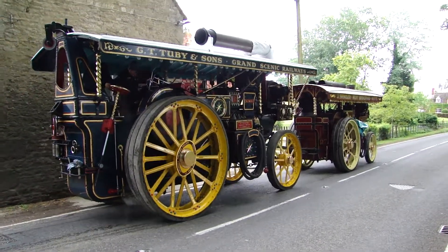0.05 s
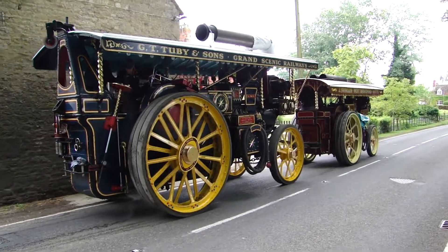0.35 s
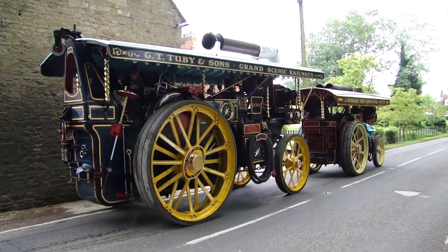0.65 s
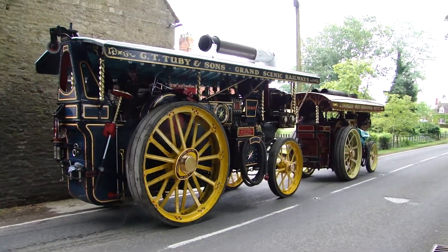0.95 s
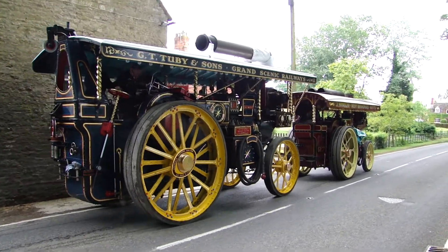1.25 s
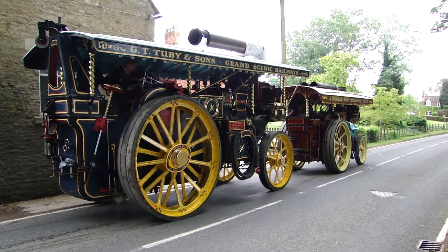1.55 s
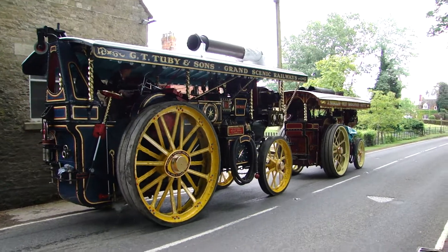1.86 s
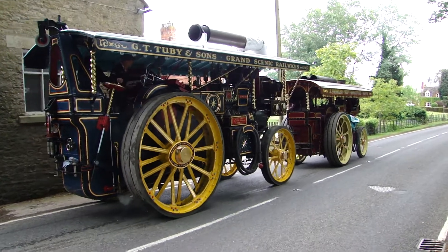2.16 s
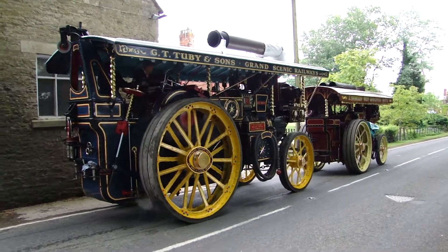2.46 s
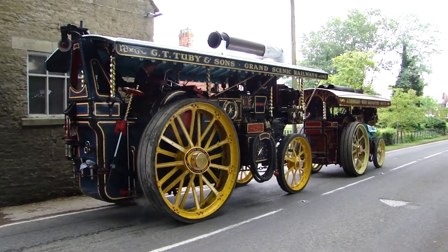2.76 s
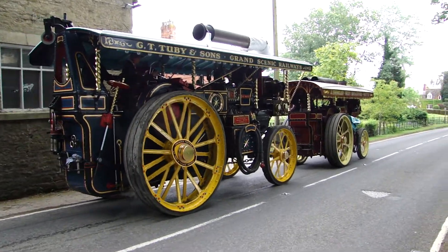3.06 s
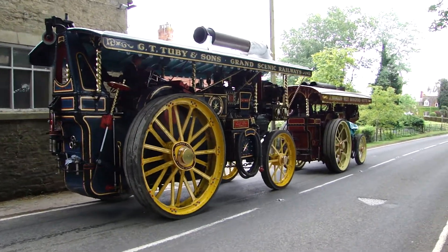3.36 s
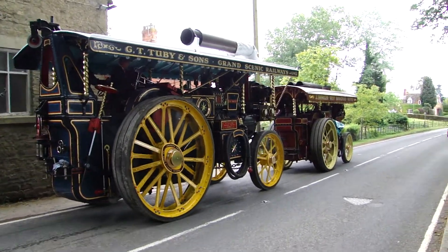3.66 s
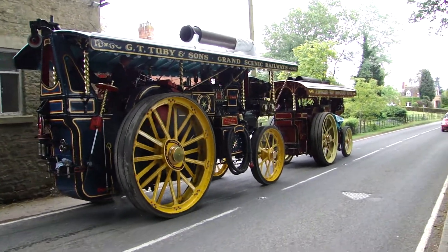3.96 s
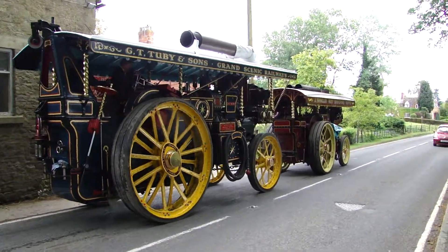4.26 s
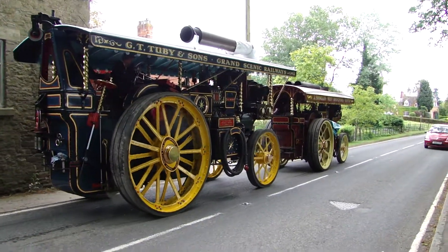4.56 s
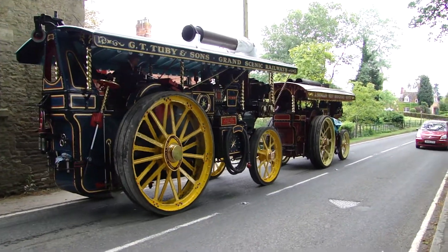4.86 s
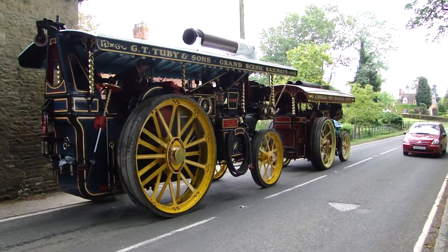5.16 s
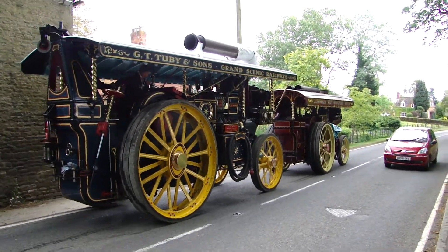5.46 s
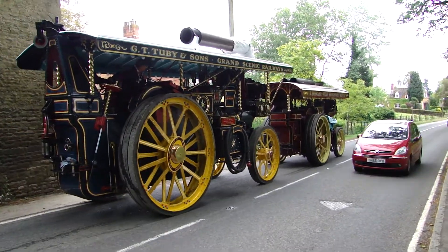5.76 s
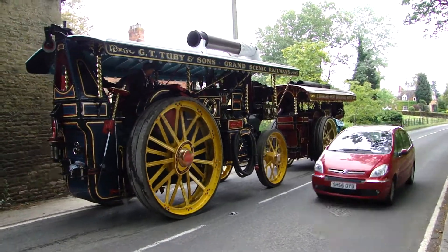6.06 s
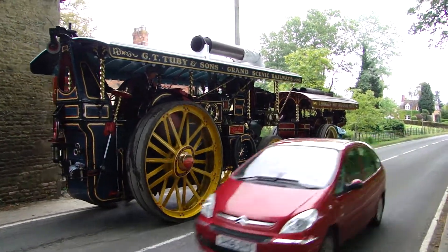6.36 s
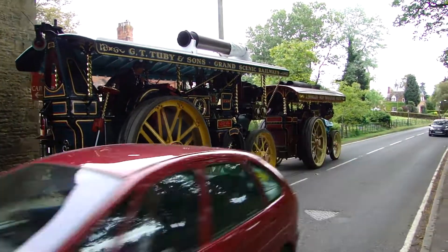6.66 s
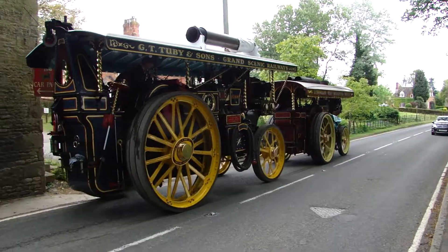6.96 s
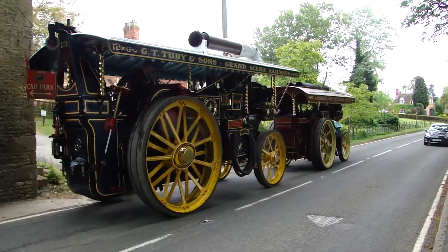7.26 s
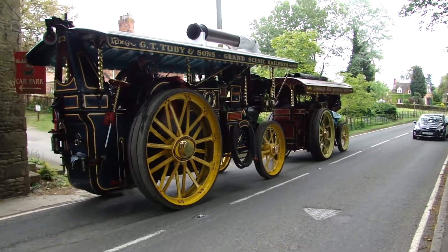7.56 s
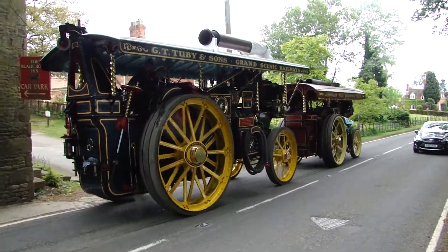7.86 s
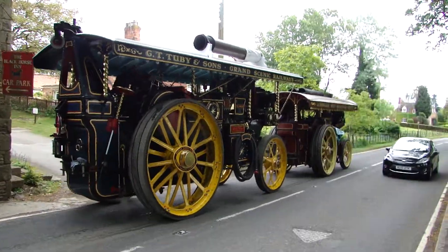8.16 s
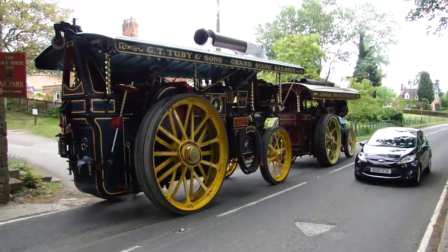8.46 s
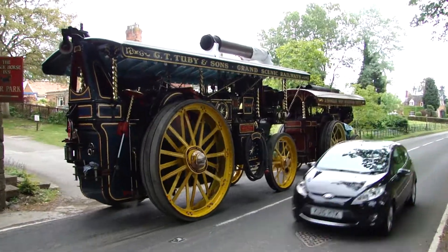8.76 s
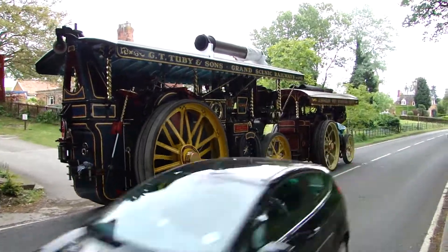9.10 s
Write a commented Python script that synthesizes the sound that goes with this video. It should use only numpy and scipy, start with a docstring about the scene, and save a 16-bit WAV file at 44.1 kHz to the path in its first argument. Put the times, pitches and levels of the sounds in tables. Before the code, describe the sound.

Two steam traction engines crawl along a village road, blowing off steam in a continuous bright hiss with a thin, wavering whistle and brief squeals. Underneath, a chimney draught roars and rings hollowly. In the second half, two cars pass close to the roadside microphone from right to left, one after the other, their tyres roaring and briefly dulling the steam.

```python
"""Two showman's steam engines blow off steam as they crawl along a village road.
At the roadside microphone pair the jet stands a little to the right: its turbulence hisses, sings in
wandering bands and whistles, while behind it the draught roars and rings in a chimney.
Two cars pass from right to left, about 3 m away, on roaring tyres;
each hides the jet for a moment with its body."""
import sys
import numpy as np
from scipy import signal
from scipy.fft import rfft, irfft, next_fast_len
from scipy.io import wavfile

SR = 44100
rng = np.random.default_rng(int(sys.argv[2]) if len(sys.argv) > 2 else 0)


def put_to_file(sound):
    """Save the sound as 16-bit audio at rate SR, in the file named by the first command-line argument."""
    columns = np.atleast_2d(sound).T  # one column per channel
    safe = np.clip(columns, -1, 1)
    whole_steps = np.round(safe * 32767)
    wavfile.write(sys.argv[1], SR, whole_steps.astype(np.int16))


N = 411453
TIME = np.arange(N) / SR

# how alike the two microphones hear the road: (frequency [Hz], coherence [0-1])
MIC_COHERENCE = [(40, 0.89), (300, 0.95), (1000, 0.67), (1550, 0.53), (2300, 0.68), (3300, 0.38),
                 (4100, 0.63), (5200, 0.57), (6500, 0.15), (8200, 0.088), (9900, 0.29), (12000, .1)]
# passing cars: (time when closest [s], speed [m/s], distance [m], tyres [dB], tread note [dB], horn [dB],
# rumble [dB], time it hides the jet [s], half the time hidden [s], shadow [dB], shadow's edge [s])
CAR_PASSES = [(6.72, 11.6, 3.0, -25, -23.2, -29, -26.3, 6.7, 0.205, 8, 0.008),
              (9.22, 11.2, 2.685, -25, -21, -27.5, -24, 9.35, 0.34, 7.5, 0.1)]

# one spurt of wet steam brightens the jet's spray
SPURT_S, SPURT_ATTACK_S, SPURT_HOLD_S, SPURT_RELEASE_S, SPURT_DB = 2.3, 0.35, 0.75, 0.25, 1.3


def from_db(db):
    """Decibels to gain."""
    return 10 ** (np.asarray(db) / 20)


def unit_power(x):
    """Scale to unit power."""
    return x / np.sqrt(np.mean(np.abs(x) ** 2) + 1e-20)


def in_time(rows):
    """Each column of a curve at every sample."""
    times, *columns = np.transpose(rows)
    return [np.interp(TIME, times, column) for column in columns]


def at_hz(points, hz):
    """Read a spectrum on a log-frequency axis."""
    frequencies, values = np.transpose(points)
    return np.interp(np.log(hz), np.log(frequencies), values)


def bump(when, span):
    """A smooth swell of height 1."""
    return np.exp(-((TIME - when) / span) ** 2)


def ramp(start, length):
    """A rise from 0 to 1 that stays."""
    return np.clip((TIME - start) / length, 0, 1)


def drift(rate_hz):
    """Slow random wander with spread 1."""
    pole = np.exp(-80 * np.pi * rate_hz / SR)
    slow = signal.lfilter([1], [1, -2 * pole, pole * pole], rng.standard_normal(N // 40 + 2002))[2000:]
    return np.interp(np.arange(N) / 40, np.arange(len(slow)), unit_power(slow))


def swells(bands, events):
    """The dB that each band gains from the swells nearest to it in pitch."""
    swell_db = np.zeros((len(bands), N))
    for when, hz, span, rise_db in events:
        nearest = np.argmin([abs(band[0] - hz) for band in bands])
        swell_db[nearest] += rise_db * bump(when, span)
    return swell_db


def mic_pair(mid, side, hz, coherence, lead_us):
    """Two complex noises as left and right; the sound reaches the left microphone lead_us earlier."""
    pair = np.sqrt(1 + coherence) * mid + np.sqrt(1 - coherence) * side * [[1], [-1]]
    pair[0] *= np.exp(2j * np.pi * hz * lead_us / 1e6)
    return pair


def turbulence(spectrum, lead_us=0):
    """Broad stereo noise of unit power."""
    size = next_fast_len(N, real=True)
    hz = np.maximum(np.arange(size // 2 + 1) * SR / size, 1)
    mid, side = rfft(rng.standard_normal((2, size)))
    pair = mic_pair(mid, side, hz, at_hz(MIC_COHERENCE, hz), lead_us)
    return unit_power(irfft(pair * from_db(at_hz(spectrum, hz)), size)[:, :N])


def noise_band(centre_hz, width_hz, coherence, lead_us=0):
    """A band of stereo noise around a fixed or moving centre; unit power."""
    lowpass = signal.butter(3, width_hz / 2, fs=SR / 20, output="sos")
    real, imag = signal.sosfilt(lowpass, rng.standard_normal((2, 2, N // 20 + 402)))[..., 400:]
    mid, side = real + 1j * imag
    pair = mic_pair(mid, side, np.mean(centre_hz), coherence, lead_us)
    envelopes = np.array([np.interp(np.arange(N) / 20, np.arange(len(mic)), mic) for mic in pair])
    carrier = np.exp(2j * np.pi * np.cumsum(centre_hz * np.ones(N)) / SR)
    return unit_power((envelopes * carrier).real)


def resonances(modes, flicker_db, coherence, lead_us):
    """Turbulence ringing in fixed resonances, each flickering by itself."""
    return sum(from_db(db + flicker_db * drift(7.9)) * noise_band(hz, width_hz, coherence, lead_us)
               for hz, width_hz, db in modes)


def chimney():
    """The slowly growing draught roars, buffets in the smokebox and sets the pipe ringing."""
    # the draught's broad roar and its irregular buffeting: (frequency [Hz], density [dB per Hz])
    roar_spectrum = [(25, -54), (45, -42), (70, -35), (105, -35), (155, -14.5), (200, -10), (330, -2),
                     (430, -4.5), (540, -2.5), (600, -0.5), (780, 2), (1200, 0.5), (1380, -2), (1750, -2),
                     (2100, 0), (3200, -32)]
    buffet_spectrum = [(25, -42), (45, -27), (70, -18), (100, -11.5), (125, -3.5), (160, -2), (205, 2.5),
                       (320, 6), (420, -6), (800, -26)]
    # the pipe's resonances and its hollow note: (frequency [Hz], width [Hz], level [dB])
    pipe_modes = [(155, 21.4, -54.5), (265.8, 28.4, -43.5), (311, 34, -48), (376, 35, -43.5),
                  (470.6, 28, -47), (919, 45, -40), (951, 39, -41), (1112, 76, -39), (1234, 45, -44.5),
                  (1526, 60, -44.5), (1825, 46, -42.5)]
    hollow_modes = [(632, 52, -35.5), (683, 38, -39.5), (721, 71, -39)]
    # brief random surges in the low roar, and a broader swell at the start:
    # (time [s], frequency [Hz], half length [s], rise [dB])
    roar_surges = [(.13, 155, .04, 11), (.35, 267, .06, 9), (.4, 470, .6, 6), (.4, 1526, .6, 2),
                   (.76, 267, 0.055, 9), (.85, 950, .07, 12), (1.4, 155, .15, 5), (1.92, 155, .22, 8),
                   (1.9, 267, 0.055, 14), (2.846, 377, .4, 3), (3.5, 377, .07, 6), (5.2, 1110, 0.051, 9),
                   (5.9, 377, .12, 9), (5.95, 267, 0.092, 5), (6.3, 267, 0.066, 12), (7.017, 267, .08, 14)]
    # the hollow note swells: (time [s], half length [s], rise [dB])
    hollow_swells = [(.5, 1.0, 3), (2.9, .35, 2), (5.7, 0.38, 5), (7.3, .25, 3.5), (7.77, .095, 8.5),
                     (8.047, 0.08, 7.5), (8.351, .2, 5.5)]
    draught_db = -1.5 + 0.1942 * TIME
    roar = from_db(-24.5 + drift(8.8)) * turbulence(roar_spectrum, lead_us=30)
    buffet = from_db(-41.5 + 3.4 * drift(9.4)) * turbulence(buffet_spectrum, lead_us=18)
    bands = [(hz, width_hz, db + surge_db)
             for (hz, width_hz, db), surge_db in zip(pipe_modes, swells(pipe_modes, roar_surges))]
    ringing = resonances(bands, flicker_db=2.5, coherence=0.91, lead_us=14)
    hollow_db = -1.5 + sum(rise_db * bump(when, span) for when, span, rise_db in hollow_swells)
    hollow = from_db(hollow_db) * resonances(hollow_modes, flicker_db=1.5, coherence=0.96, lead_us=18)
    return ((roar + buffet + ringing) * from_db(draught_db) + hollow) * from_db([[-0.4], [0.4]])


def passing(closest, speed, distance):
    """Stereo gain of a source going by from right to left, and the share of its speed that points away."""
    along = speed * (TIME - closest)
    reach = np.hypot(along, distance)
    receding = along / reach
    return distance / reach * from_db(0.87 * receding * np.array([[1], [-1]])), receding


def cars():
    """Tyres roar; the tread note beams ahead and falls in pitch going by; rumble and wake trail."""
    # tyre noise and the rumble of body and engine: (frequency [Hz], density [dB per Hz])
    tyre_spectrum = [(200, -42), (500, -10), (700, -3), (850, -4), (1010, -9), (1220, 3), (1400, -8),
                     (2000, -13), (3000, -24), (6000, -28), (12000, -44)]
    rumble_spectrum = [(25, -36), (60, -27), (110, -23), (180, -6), (285, 4.5), (420, 3), (620, 4),
                       (850, -6.5), (1500, -19), (4000, -41)]
    wheelbase_m, wake_lag_s = 2.7, 0.24
    tread_hz, horn_hz, wake_hz = 1001, 871, 1348
    out = 0
    for closest, speed, distance, tyre_db, tread_db, horn_db, rumble_db, *_ in CAR_PASSES:
        front, _ = passing(closest - 0.14, speed, distance)
        back, _ = passing(closest - 0.14 + wheelbase_m / speed, speed, distance)
        middle, receding = passing(closest, speed, distance)
        rear, _ = passing(closest + 0.056, speed, distance)
        behind, _ = passing(closest + wake_lag_s, speed, distance)
        doppler = 1 / (1 + speed * receding / 343)
        axles = np.hypot(front ** 2.8, back ** 4.2) / np.sqrt(1.5)
        # air pumped from the tread grooves rings
        tread = noise_band(tread_hz * doppler, width_hz=185, coherence=0.94)
        tread *= from_db(tread_db - 1.5 * receding) * axles
        tyres = from_db(tyre_db) * middle ** 1.24 * turbulence(tyre_spectrum)
        # the wedge between tyre and road acts as a horn and throws noise ahead
        horn = noise_band(horn_hz * doppler, width_hz=345, coherence=0.92)
        horn *= from_db(horn_db - 7.5 * receding) * middle
        rumble = from_db(rumble_db) * rear * turbulence(rumble_spectrum)
        # tread noise thrown back behind the car, off the road and the stone wall
        wake = noise_band(wake_hz, width_hz=670, coherence=0.24)
        wake *= from_db(-31.5 + 3 * receding) * behind ** 1.05
        uneven_asphalt = from_db(1.7 * drift(14.5))
        out = out + uneven_asphalt * (tread + tyres + horn + wake) + rumble
    return out


def car_shadow():
    """The dB lost while a car's body stands between jet and microphones."""
    return sum(depth_db * 0.5 * (1 + np.tanh((span - np.abs(TIME - when)) / (2 * edge)))
               for *_, when, span, depth_db, edge in CAR_PASSES)


def street_echoes(direct):
    """Nearby surfaces comb the hiss; the paths shift slightly as the microphones sway."""
    # echoes from canopy, road and stone wall: (delay [ms], level [dB])
    reflections = [(4.3, -13), (11.7, -13), (26.6, -17.5)]
    samples = np.arange(N)
    out = direct
    for delay_ms, level_db in reflections:
        earlier = samples - SR * (delay_ms + 0.076 * drift(0.59)) / 1000
        echo = np.array([np.interp(earlier % N, samples, channel) for channel in direct])
        out = out + from_db(level_db) * echo
    return out


def squeals():
    """Now and then a band of the jet locks into a thin, wavering tone."""
    # squeals: (time [s], frequency [Hz], half length [s], level [dB])
    tones = [(2.25, 2410, .22, -34), (3.98, 2420, 0.19, -31), (4.6, 2385, .19, -29),
             (4.63, 2680, .1, -29.5), (5.42, 2700, .11, -27), (6.36, 2700, .08, -28),
             (6.55, 2700, .05, -29), (6.873, 2688, 0.14, -27.5), (6.95, 2234, 0.051, -22.5),
             (7.15, 2300, .12, -28)]
    out = 0
    for when, hz, span, db in tones:
        phase = 2 * np.pi * np.cumsum(hz + 6 * drift(28.2)) / SR
        out = out + from_db(db) * bump(when, span) * np.sin(phase)
    return out


def flares():
    """The jet catches higher overtones for a while and lets them go."""
    # brief overtones: (time [s], frequency [Hz], width [Hz], half length [s], level [dB])
    overtones = [(1.6, 6770, 400, .5, -42), (2.8, 11250, 400, .3, -37), (2.75, 12150, 350, .25, -34),
                 (3.3, 9000, 1800, .22, -35), (4.1, 11450, 250, .45, -40), (4.3, 4995, 150, 1.2, -35.5),
                 (4.55, 6620, 230, .5, -35), (5.95, 6600, 180, .45, -40), (6.05, 4980, 160, .4, -34),
                 (6.1, 5200, 120, .4, -37), (6.95, 3420, 550, 0.061, -31), (7.1, 8560, 180, .17, -41),
                 (7.4, 3050, 250, .4, -35), (8.2, 9540, 1500, .35, -37), (8.202, 5350, 220, 0.32, -33),
                 (8.55, 5655, 130, 0.45, -33.5)]
    out = 0
    for when, hz, width_hz, span, db in overtones:
        band = noise_band(hz, width_hz, coherence=at_hz(MIC_COHERENCE, hz), lead_us=35)
        out = out + from_db(db) * bump(when, span) * band
    return out


def whistle():
    """The jet's thin whistle: a narrow core inside a skirt of hiss, both on one sinking pitch."""
    # the whistle's course: (time [s], frequency [Hz], level [dB], core's share of the power [0-1])
    course = [(0, 2755, -31.5, .1), (2.1, 2770, -29.5, .15), (2.8, 2700, -30, 0.1), (3.6, 2695, -30, .55),
              (5.5, 2695, -29.5, .75), (6.9, 2685, -32.5, .95), (7.4, 2680, -30, .3), (7.9, 2690, -36, .2),
              (8.5, 2680, -31, .2), (9.33, 2675, -34, .5)]
    hz, level_db, core_share = in_time(course)
    hz = hz + 16 * drift(3)
    core = np.sqrt(core_share) * noise_band(hz, width_hz=65, coherence=0.76, lead_us=45)
    skirt = np.sqrt(1 - core_share) * noise_band(hz, width_hz=190, coherence=0.7, lead_us=45)
    return from_db(level_db + 1.1 * drift(4.6)) * (core + skirt) * from_db([[-1.1], [1.1]])


def spray_change(sag_db_per_s=0.32):
    """The dB by which the jet's spray departs from its start: a slow fall and one spurt."""
    release = ramp(SPURT_S + SPURT_ATTACK_S + SPURT_HOLD_S, SPURT_RELEASE_S)
    return SPURT_DB * (ramp(SPURT_S, SPURT_ATTACK_S) - release) - sag_db_per_s * TIME


def steam_song():
    """Over a steady edge tone the jet sings in wandering bands that follow its register and swell."""
    # the edge tone and its faint overtones: (frequency [Hz], width [Hz], level [dB])
    edge_tone = [(4980, 170, -37)]
    overtones = [(6660, 400, -48), (9800, 600, -45)]
    # singing bands: (frequency [Hz], width [Hz], level [dB], share of a car's shadow [0-1],
    # lasting shift from the spurt [Hz], shift in the high register [Hz], gain in the high register [dB])
    bands = [(2215, 235, -32, 1, 20, 45, 0.5), (2410, 164, -31, .63, -15, 10, 0),
             (3975, 420, -26.5, 0.71, -140, 130, -7.5), (4143, 300, -30, .9, 5, 20, 2),
             (4460, 260, -30.5, 1, -70, 40, 1.5), (4640, 274, -36, 0.65, 0, 10, 12)]
    # one band swells: (time [s], frequency [Hz], half length [s], rise [dB])
    band_swells = [(.45, 2218, .24, 4.5), (.05, 4460, .1, 4), (.98, 4460, .14, 2.5), (1.7, 3975, 0.77, 0.5),
                   (1.85, 2410, .7, 3.5), (2.05, 4460, .2, 2.5), (3.0, 2218, 0.2, 4.5), (3.3, 4460, .2, 4),
                   (4.3, 3975, 0.97, 1), (5.18, 4150, .12, 4), (5.9, 3975, .5, 3.5), (6.25, 4150, .22, 4),
                   (6.3, 4630, .16, 3), (7.38, 4630, .06, 3.5), (7.7, 4630, .04, 3.5),
                   (7.958, 4630, .03, 4), (8.11, 4150, .12, 7), (8.65, 4630, .12, 2.5), (8.9, 4150, .3, 3)]
    # the song's course: (time [s], register [0 low, 1 high])
    register_course = [(0, .08), (2.3, 0.02), (4.6, .15), (6.3, 0.42), (6.93, .68), (7.3, 0.95),
                       (7.7, 0.96), (8.5, 0.77), (9.33, .65)]
    register, = in_time(register_course)
    shadow_db, spray_db = car_shadow(), spray_change()
    after_spurt = ramp(SPURT_S, SPURT_ATTACK_S + SPURT_HOLD_S)
    force_db = 2.2 * (spray_db - np.median(spray_db))   # a harder jet brings out its overtones
    out = from_db(force_db) * resonances(overtones, flicker_db=1.2, coherence=0.64, lead_us=44)
    out += resonances(edge_tone, flicker_db=3, coherence=0.87, lead_us=17)
    for band, swell_db in zip(bands, swells(bands, band_swells)):
        hz, width_hz, level_db, hidden, spurt_hz, high_hz, high_db = band
        band_db = level_db + high_db * register + swell_db - hidden * shadow_db + 0.72 * drift(8.2)
        centre_hz = hz + spurt_hz * after_spurt + high_hz * register + 24 * drift(3)
        # low bands lie right, high ones left
        pan_db = np.interp(hz, [2700, 3900], [-1.1, 0.7]) * np.array([[1], [-1]])
        out += from_db(band_db + pan_db) * noise_band(centre_hz, width_hz, coherence=0.73, lead_us=43.4)
    return out


def steam_hiss():
    """The slowly weakening jet hisses, fluttering with the steam's wetness; the spurt leaves a sizzle."""
    # the jet's fine spray and coarser rush: (frequency [Hz], density [dB per Hz])
    spray_spectrum = [(3000, -46), (6000, -6), (6500, -4), (7700, 1.5), (8600, 1.8), (9400, 3), (10000, 3),
                      (10900, 2.5), (11400, 0.5), (12100, -1), (12600, -11), (13000, -47)]
    rush_spectrum = [(1200, -37), (1900, 0), (2250, 1.5), (2560, 3), (2950, 3.5), (3300, -0.5), (3700, 1.5),
                     (4400, -1), (5100, 2), (5400, 1), (6200, -0.5), (7050, -1), (7550, -8), (9500, -38)]
    # sizzle of wet steam: (frequency [Hz], width [Hz], level [dB])
    sizzle_bands = [(10350, 220, -44.5), (11370, 300, -36), (12080, 300, -45)]
    rush_sag_db_per_s, sizzle_fade_db_per_s = 0.24, 2
    spray_db = -23 + spray_change() - 0.048 * car_shadow()
    rush_db = -19.5 - rush_sag_db_per_s * TIME - 0.28 * car_shadow()
    spray = from_db(spray_db) * turbulence(spray_spectrum, lead_us=42.4)
    rush = from_db(rush_db) * turbulence(rush_spectrum, lead_us=35.5)
    since_peak_s = np.maximum(TIME - SPURT_S - SPURT_ATTACK_S, 0)
    wetness = ramp(SPURT_S, SPURT_ATTACK_S) * from_db(-sizzle_fade_db_per_s * since_peak_s)
    sizzle = wetness * resonances(sizzle_bands, flicker_db=3, coherence=0.1, lead_us=48)
    return (spray + rush + sizzle) * from_db(0.65 * drift(8.5))


def scene():
    """From the roadside: chimney, cars and, a little right, the jet; its thin tones arrive without echo."""
    jet = street_echoes(steam_hiss() + steam_song() + flares()) + whistle() + squeals()
    return chimney() + from_db([[-0.6], [-0.3]]) * jet + cars()


def record(dry):
    """The top is cut steeply."""
    cutoff_hz = 12900
    return signal.sosfilt(signal.ellip(12, 0.1, 90, cutoff_hz, fs=SR, output="sos"), dry)


dry = scene()
out = record(dry)
put_to_file(out)
```